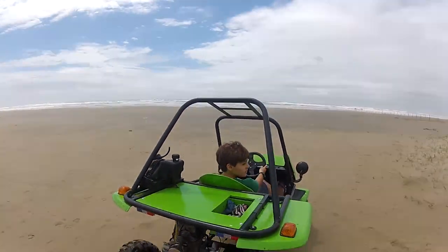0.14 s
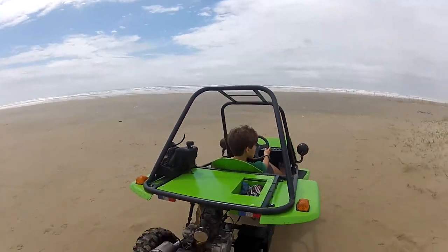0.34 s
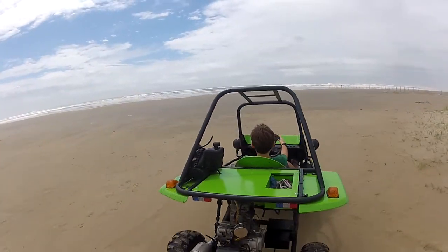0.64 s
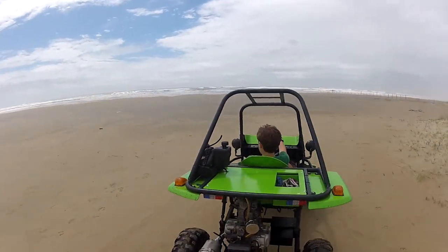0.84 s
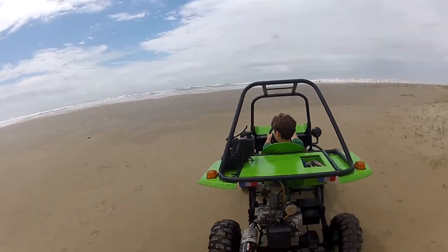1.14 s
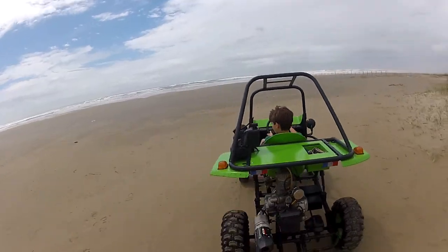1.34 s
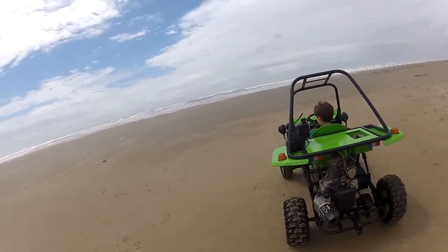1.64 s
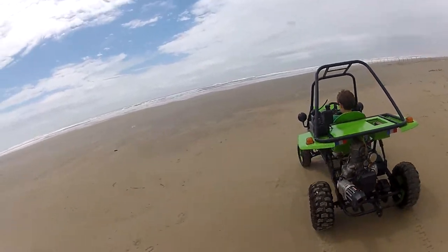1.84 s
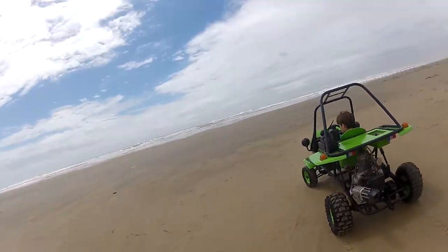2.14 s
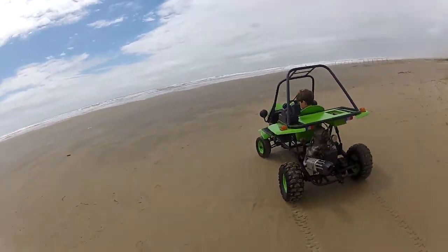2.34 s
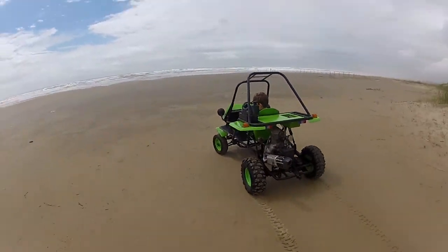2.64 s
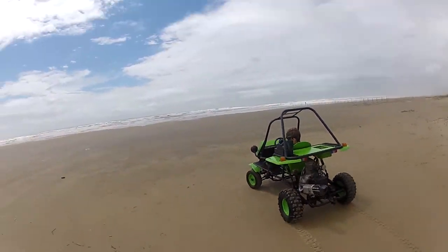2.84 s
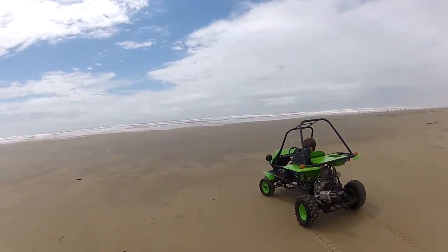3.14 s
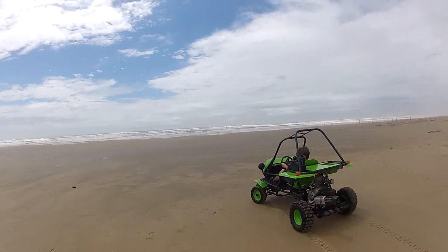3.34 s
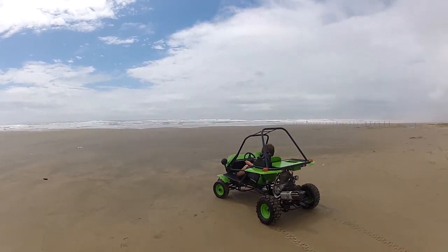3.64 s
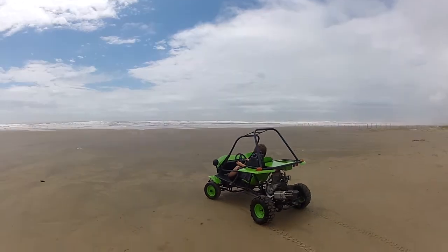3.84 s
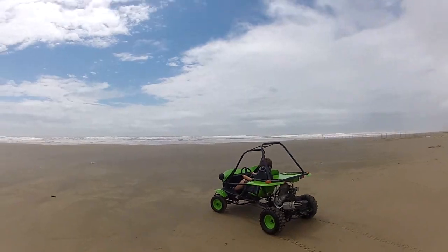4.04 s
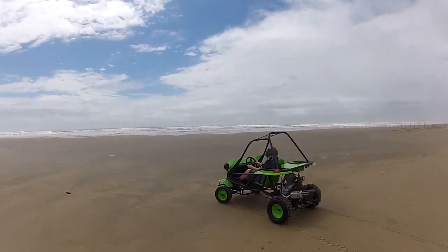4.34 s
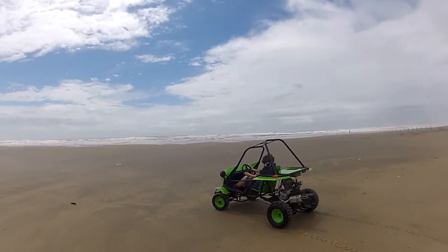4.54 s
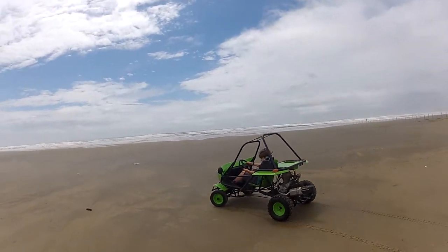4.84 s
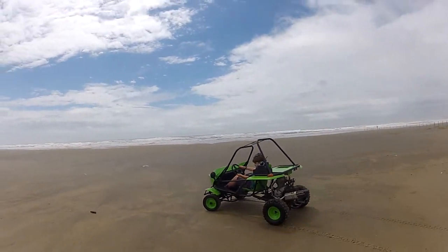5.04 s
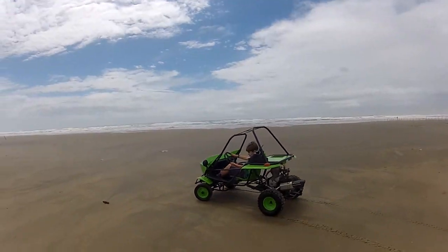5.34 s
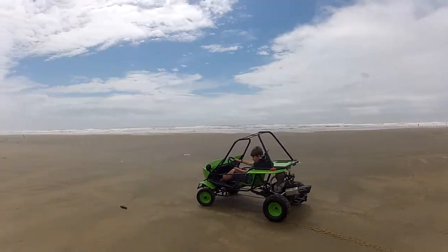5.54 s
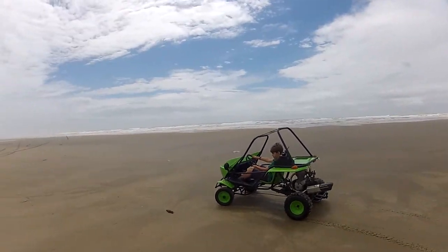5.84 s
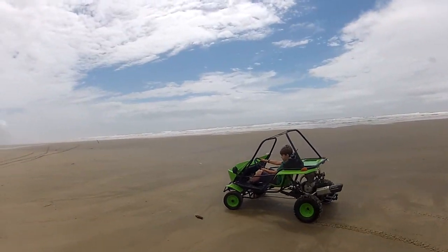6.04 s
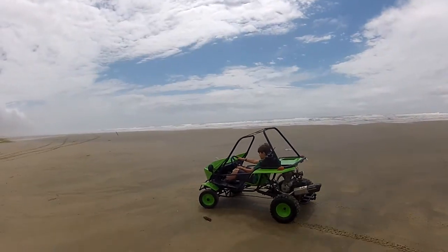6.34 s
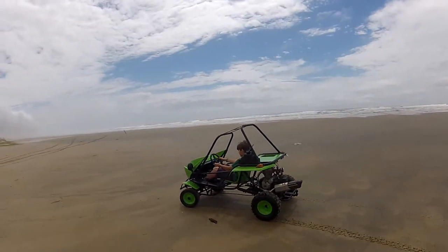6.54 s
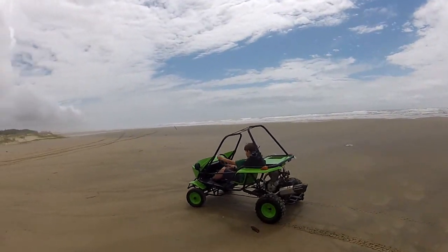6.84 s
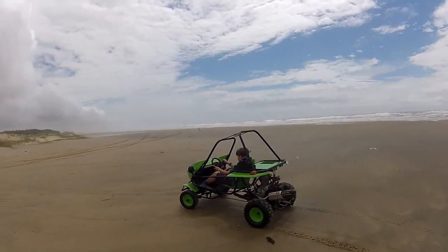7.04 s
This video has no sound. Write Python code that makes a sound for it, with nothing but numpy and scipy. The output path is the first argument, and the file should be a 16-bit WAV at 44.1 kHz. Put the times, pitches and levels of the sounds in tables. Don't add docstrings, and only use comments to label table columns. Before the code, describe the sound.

Outdoors on a beach, a little four-stroke engine chugs with boomy muffler pulses, ticking valves and jangling loose parts. It bogs briefly, then climbs to a quicker putter as the buggy moves off. A hand on the plastic camera case makes very close, loud clacks, low bumps and scraping, mostly in the third second, with a few later. Distant surf stays dull and faint, swelling slightly at the end. Lo-fi mono with harsh, grainy upper edges.

```python
import sys
import numpy as np
from scipy import signal
from scipy.fft import rfft, irfft
from scipy.io import wavfile
from scipy.ndimage import uniform_filter1d

SR = 44100
rng = np.random.default_rng(int(sys.argv[2]) if len(sys.argv) > 2 else 0)


def inscribe(sig):
    pcm = np.round(np.clip(np.atleast_2d(sig).T, -1, 1) * 32767)
    wavfile.write(sys.argv[1], SR, pcm.astype(np.int16))


def voltage_ratio(level):
    return 10 ** (np.asarray(level, float) / 20)


N = 317520
T = np.arange(N) / SR


def unit(x):
    return x / np.sqrt(np.mean(x ** 2))


def noise():
    return rng.standard_normal(N)


def band_noise(order, band_hz):
    sos = signal.butter(order, band_hz, "bandpass", fs=SR, output="sos")
    return unit(signal.sosfilt(sos, noise()))


def ring(x, hz, width_hz):
    b, a = signal.iirpeak(hz, hz / width_hz, fs=SR)
    return signal.lfilter(b, a, signal.lfilter(b, a, x))


def decay(t, t60_s):
    return np.exp(-np.log(1000) * t / t60_s)


def walk(rate_hz):
    k = int(SR / rate_hz)
    steps = np.repeat(rng.standard_normal(N // k + 1), k)
    return unit(uniform_filter1d(uniform_filter1d(steps, k), k)[:N])


def add(out, start_s, x):
    i = int(start_s * SR)
    out[i:i + len(x)] += x[:N - i]


def grit(spread_db):
    return noise() * voltage_ratio(spread_db * rng.exponential(size=N))


def whistle(hz, width_hz, steady):
    lowpass = signal.butter(2, width_hz / 2, fs=SR, output="sos")
    slow = unit(signal.sosfilt(lowpass, [noise(), noise()]))
    turn = 2 * np.pi * np.cumsum(hz) / SR
    return unit((steady + slow[0]) * np.sin(turn) + slow[1] * np.cos(turn))


def bump(phase, sharpness, at, times=1):
    return np.exp(sharpness * (np.cos(2 * times * np.pi * (phase - at)) - 1))


def chambers(pulses, band_hz, early_s):
    sos = signal.cheby1(3, 1.5, band_hz, "bandpass", fs=SR, output="sos")
    h = signal.sosfilt(sos, np.r_[np.hanning(60), np.zeros(SR // 8)])
    top = np.argmax(np.abs(h))
    return unit(signal.fftconvolve(pulses, -h / h[top])[top + int(early_s * SR):][:N])


def exhaust(fire, gulp, rear):
    boom = (1 - rear) * chambers(fire + gulp, (89.8, 179), early_s=0.0001)
    boom = boom + rear * chambers(fire + gulp, (77, 164.8), early_s=0.0001)
    pipe_echo = 0.39 * np.roll(fire, 800)
    bark = rear * voltage_ratio(-17) * chambers(fire + pipe_echo + 0.6 * gulp, (259, 422), early_s=0.0021)
    shell = voltage_ratio(-20.5) * chambers(fire, (200, 295), early_s=-0.0027)
    flutter = voltage_ratio(-17) * band_noise(3, (70, 200))
    return boom + bark + shell + flutter


def valve_gear(phase, uneven_db, rear, port_hz):
    stroke = bump(phase, 8.8, 0.03, times=2) * voltage_ratio(uneven_db)
    puff = bump(phase, 3.5, 0.13)
    tappet = unit(whistle(np.full(N, 1660.), 260, 0.9) * (0.35 + 0.6 * stroke + puff))
    port = voltage_ratio(-1.0 - 14 * rear) * unit(whistle(port_hz, 180, 1.2) * (0.2 + puff))
    return tappet + port


# pitch_hz, width_hz, side_level_db, added_from_behind_db
RATTLE_MODES = [
    (860, 176, -9, 0),
    (1410, 780, -9.5, 5.8),
    (2115, 480, 0, -7),
    (2440, 220, -6, 0),
    (2957, 110, -10, 3),
    (3254, 260, -4, 1.5),
    (3630, 450, -15.5, 11.5),
]


def loose_parts(phase, rear):
    gate = 1.6 + bump(phase, 1.5, 0.15, times=2)
    rattle = np.zeros(N)
    for hz, width_hz, side_db, rear_db in RATTLE_MODES:
        level = voltage_ratio(side_db + rear_db * rear + 2.4 * walk(9))
        rattle += level * unit(ring(grit(0.89) * gate, hz, width_hz))
    shield_level = voltage_ratio(-4.0 + 9.5 * rear + 1.6 * walk(30))
    shield = shield_level * unit(whistle(2710 - 100 * rear, 236, 0.34) * gate)
    return unit(rattle) + shield


# time_s, level_db at the camera, seen_from_behind (0-1), chassis_shake_db
DRIVE = [(0, -39.5, .88, 3), (.6, -42.5, .87, -2), (1, -42, .8, 2.5), (1.15, -38, .9, -4),
         (1.4, -38, .8, -1), (1.9, -38, .63, 0), (2.6, -39, .55, -1), (3.3, -40.5, .33, -2),
         (4.2, -42, .2, -.5), (5.2, -42.5, .2, -.5), (6.2, -42.5, .25, .5), (6.8, -41, .25, 1.5),
         (7.2, -41, .18, 1.5)]
# time_s, firings_per_s
ENGINE_SPEED = [(0, 15.648), (.95, 12.78), (1.7, 15.736), (2.35, 17.472), (2.55, 17.486), (3.25, 19.221),
                (3.55, 19.112), (3.7, 19.882), (4.5, 20.473), (5, 21.728), (5.25, 21.459), (5.55, 22.518),
                (6.25, 22.188), (6.5, 22.864), (7.2, 22.721)]
# time_s, whistle_hz, valve_gear_gain_db
PORT_TURN = [
    (5.3, 1150, 0),
    (6.2, 1230, 4),
    (6.8, 1300, 2),
]


def engine():
    phase = -0.444 + np.cumsum(np.interp(T, *np.transpose(ENGINE_SPEED))) / SR
    when, *columns = np.transpose(DRIVE)
    thud_db, rear, shake_db = (np.interp(T, when, c) for c in columns)
    rear = np.clip(rear, 0, 1)
    port_s, *turning = np.transpose(PORT_TURN)
    port_hz, valve_db = (np.interp(T, port_s, c) for c in turning)
    scatter = rng.standard_normal((int(phase[-1]) + 3, 3))[np.floor(phase).astype(int) + 1].T
    fire = np.diff(np.floor(phase), prepend=-1) * voltage_ratio(0.54 * scatter[0])
    gulp_level = voltage_ratio(-18.5 + 4.2 * rear + 1.3 * scatter[1])
    gulp = np.diff(np.floor(phase + 0.52), prepend=-1) * gulp_level
    out = voltage_ratio(thud_db) * exhaust(fire, gulp, rear)
    out += voltage_ratio(thud_db - 25 + 8 * rear + valve_db) * valve_gear(phase, 1.5 * scatter[2], rear, port_hz)
    out += voltage_ratio(thud_db - 15 - rear + shake_db) * loose_parts(phase, rear)
    return out


# time_s, level_db
HAND_JOLTS = [(.38, -41), (.66, -45), (1, -46), (1.22, -43), (1.95, -33), (2.13, -27), (2.4, -31),
              (2.61, -32), (2.77, -37), (2.95, -33), (3.5, -40), (4.27, -42), (7.06, -38)]


def sway():
    stops_s, walking_db, still_db, jolt_s = 4.7, -51, -59, 0.05
    motion = voltage_ratio(np.interp(T, (stops_s - 0.3, stops_s), (walking_db, still_db)))
    for s, db in HAND_JOLTS:
        motion += voltage_ratio(db) * np.exp(-((T - s) / jolt_s) ** 2)
    return voltage_ratio(-4.5) * band_noise(2, (18, 65)) * motion


# pitch_hz, level_db (per Hz)
SURF_COLOUR = [(25, -1), (70, -25), (280, -5.5), (340, -8.5), (850, -12.5), (1030, -34), (1300, -23),
               (2700, -26), (3600, -17)]


def surf():
    hz, db = np.transpose(SURF_COLOUR)
    colour = voltage_ratio(np.interp(np.log(np.fft.rfftfreq(N, 1 / SR) + 1), np.log(hz), db))
    swell_db = np.interp(T, (5.6, 7.2), (0, 5))
    return voltage_ratio(-55 + swell_db + 1.2 * walk(3.17)) * unit(irfft(rfft(noise()) * colour, N))


# time_s, level_db, pitch_hz, ring_s (to fade 60 dB)
CASE_THUMPS = [(0.348, -31, 48.4, 0.09), (0.789, -41, 70.4, 0.072), (1.929, -12, 147, 0.051),
               (2.019, -30, 102, 0.08), (2.078, -17, 123, 0.086), (2.149, -32, 37.7, 0.055),
               (2.253, -17, 87, 0.074), (2.393, -10.5, 175, 0.05), (2.469, -26, 99, 0.08),
               (2.59, -21, 35.0, 0.086), (2.619, -32, 32.3, 0.08), (2.745, -18, 45.8, 0.11),
               (2.769, -16, 61.4, 0.08), (2.818, -37, 153, 0.08), (2.959, -25, 45.8, 0.08),
               (3.043, -26, 94, 0.17), (3.06, -13, 113, 0.08), (3.09, -21.5, 133, 0.067),
               (3.499, -43, 135, 0.08), (3.939, -21.5, 159, 0.068), (4.263, -17, 128, 0.11),
               (4.379, -40, 53.8, 0.08), (7.036, -19, 75, 0.06)]


def thumps():
    out, t = np.zeros(N), T[:SR // 4]
    for s, db, hz, t60_s in CASE_THUMPS:
        swell = (1 - np.exp(-t / 0.0019)) * decay(t, max(t60_s, 0.01))
        add(out, s, -voltage_ratio(db) * swell * np.sin(2 * np.pi * hz * t))
    return out


# time_s, level_db, pitch_hz, ring_s
PART_PINGS = [(.349, -34, 496, 0.026), (1.094, -41.5, 1640, 0.054), (1.134, -38, 2560, 0.027),
              (1.277, -40.5, 2560, 0.02), (1.31, -38, 1630, .04), (1.349, -39.5, 2510, 0.028),
              (1.398, -39, 2560, 0.03), (1.423, -31.5, 2630, 0.017), (1.929, -32, 530, 0.049),
              (2.08, -31.5, 495, 0.13), (2.253, -24.5, 282, 0.033), (2.393, -21, 200, 0.035),
              (2.394, -9, 640, 0.023), (2.394, -9.5, 2570, 0.021), (2.395, -13, 3220, 0.018),
              (2.394, -10, 3600, 0.011), (2.586, -38, 256, 0.053), (3.09, -30.5, 216, 0.21),
              (3.51, -34.5, 605, 0.032), (3.939, -32, 333, 0.017), (4.202, -44, 1000, 0.016),
              (4.267, -32, 264, .04), (4.267, -18.5, 860, 0.035), (4.38, -18.5, 2480, 0.013)]


def pings():
    out, t = np.zeros(N), T[:SR // 5]
    for s, db, hz, t60_s in PART_PINGS:
        swell = (1 - np.exp(-t / 0.00052)) ** 2 * decay(t, t60_s)
        add(out, s, voltage_ratio(db) * swell / swell.max() * np.sin(2 * np.pi * hz * t))
    return out


# pitch_hz, relative_ring_time, level_db, part (0 shell, 1 lid, 2 latch)
CASE_MODES = [
    (640, 0.84, -9, 0),
    (860, 1.18, 1, 0),
    (1160, 0.7, 0, 1),
    (1432, 0.62, 1, 1),
    (1777, 0.86, 1, 1),
    (2120, 0.65, 0.5, 1),
    (2570, 0.84, -0.5, 1),
    (3230, 0.48, -0.5, 2),
    (3570, .6, 8.5, 2),
]
# time_s, shell_db, lid_db, lid_centre_hz
CASE_KNOCKS = [(.351, -39.5, -60, 1580), (.781, -36, -34, 1500), (1.927, -33, -25, 1180),
               (2.026, -39, -40, 1350), (2.137, -15, -27.5, 1970), (2.154, -49, -34, 2120),
               (2.252, -27, -12.5, 1900), (2.393, -3, -8.5, 2100), (2.409, -30, -35, 2200),
               (2.56, -32, -41, 1890), (2.584, -38, -36, 1300), (2.745, -31, -24, 2310),
               (2.751, -15, -11, 1450), (2.763, -44, -21, 1610), (2.809, -47, -43, 1180),
               (2.867, -41, -39, 2230), (2.956, -33, -24, 2370), (2.962, -38, -32, 1390),
               (2.988, -48, -34, 1260), (3.004, -54, -33, 1860), (3.033, -47, -35.5, 1920),
               (3.062, -26, -29, 1370), (3.089, -39, -28, 1770), (3.509, -44, -45, 1163),
               (3.94, -55, -27, 1900), (4.24, -46, -38, 2240), (4.262, -25, -27, 2300),
               (4.266, -26, -10.5, 2100), (4.379, -32.5, -28, 2300), (7.054, -52, -44, 1670)]


def knocks():
    out, t, rise_s = np.zeros(N), T[:SR // 16], 0.0006
    chance = rng.standard_normal((len(CASE_KNOCKS), 300 + len(CASE_MODES)))
    for (s, shell_db, lid_db, lid_hz), row in zip(CASE_KNOCKS, chance):
        ranges = (0.026, 0.018), (0.0011, 0.0006), (-2, 5)
        t60_s, contact_s, snap_db = (np.interp(max(shell_db, lid_db), (-35, -10), r) for r in ranges)
        push = row[:300] * np.exp(-t[:300] / contact_s)
        crack = row[:300] * np.exp(-t[:300] / 0.0012)
        add(out, s + rise_s, crack / np.abs(crack).max() * voltage_ratio(lid_db))
        snap = np.exp(-((t[:24] - t[12]) / 0.00008) ** 2)
        add(out, s + rise_s, snap * voltage_ratio(lid_db + snap_db))
        detune = 1 + 0.011 * row[300:]
        for (hz, long, db, part), k in zip(CASE_MODES, detune):
            swell = (1 - np.exp(-t / rise_s)) * decay(t, t60_s * long)
            tone = signal.fftconvolve(push, swell * np.sin(2 * np.pi * hz * k * t))
            lid_mode_db = lid_db - 9 * abs(np.log2(hz / lid_hz))
            struck_db = (shell_db, lid_mode_db, lid_db - 17)[int(part)]
            add(out, s, tone / np.abs(tone).max() * voltage_ratio(struck_db + db - 0.5))
    return signal.sosfilt(signal.butter(3, 430, "highpass", fs=SR, output="sos"), out)


# start_s, firmest_s, end_s, level_db, brightness_db
FINGER_STROKES = [(.41, .48, .6, -54, -4), (.7, .765, .86, -48.5, -2), (1.92, 1.935, 2.01, -42, -1),
                  (2.015, 2.04, 2.07, -42, -4), (2.045, 2.088, 2.18, -29.5, -8),
                  (2.16, 2.22, 2.27, -37, -7), (2.23, 2.3, 2.39, -35.5, 0), (2.4, 2.47, 2.55, -38, 0),
                  (2.5, 2.555, 2.58, -32.5, -2), (2.57, 2.62, 2.72, -46.5, -6),
                  (2.74, 2.762, 2.79, -35, -2), (2.855, 2.93, 3.05, -36.5, -6.5),
                  (3.04, 3.09, 3.12, -41, -7), (3.37, 3.46, 3.57, -58, 6), (7, 7.05, 7.12, -56, -4)]


def rubs():
    level, bright = np.zeros(N), np.zeros(N)
    for start, firm, end, db, bright_db in FINGER_STROKES:
        away = np.interp(T, (start, firm, end), (1, 0, 1))
        press = (away < 1) * voltage_ratio(db - 18 * away ** 2.1)
        level += press
        bright += press * voltage_ratio(bright_db)
    drag = voltage_ratio(2.5 * walk(90))
    slips = grit(5.5) * drag
    modes = []
    for hz, long, *_ in CASE_MODES:
        scrape = unit(grit(2.86) * drag) + 0.9 * unit(slips)
        modes.append(voltage_ratio(3.6 * walk(25.1)) * unit(ring(scrape, hz, 260 / long)))
    flex = voltage_ratio(-4) * unit(ring(slips, 185, 110)) + voltage_ratio(-12) * unit(ring(slips, 520, 130))
    return level * (unit(sum(modes[:6])) + flex) + bright * unit(sum(modes[6:]))


# start_s, end_s, pitch_hz, level_db
CASE_CREAKS = [
    (2.405, 2.479, 616, -31),
    (3.06, 3.17, 778, -45),
    (3.512, 3.542, 616, -48),
    (3.066, 3.11, 1830, -40),
    (3.088, 3.1, 1370, -29),
    (3.082, 3.102, 3390, -36),
]


def creaks():
    out = np.zeros(N)
    for start, end, hz, db in CASE_CREAKS:
        fade_in = np.clip((T - start) / 0.0023, 0, 1)
        fade_out = np.clip((end - T) / (0.39 * (end - start)), 0, 1)
        turn = 2 * np.pi * np.cumsum(hz * (1 + 0.0102 * walk(50))) / SR
        out += voltage_ratio(db + 3.2 * walk(60)) * fade_in * fade_out * np.sin(turn)
    return out


def scene():
    mix = engine() + sway() + surf() + thumps() + pings() + knocks() + rubs() + creaks()
    return np.tile(mix, (2, 1))


def top_cut(x):
    return signal.sosfilt(signal.butter(12, 16520, fs=SR, output="sos"), x)


def record(dry):
    x = signal.sosfilt(signal.butter(6, 3500, fs=SR, output="sos"), dry[0])
    slow = 1.362 * np.tanh(signal.resample_poly(x, 80, 441) / 1.241)
    held = signal.resample_poly(np.repeat(slow, 6), 147, 160)[:N]
    gentle_cut = signal.ellip(8, 0.3, 54, 15270, fs=SR, output="sos")
    steep_cut = signal.ellip(10, 0.2, 80, 16400, fs=SR, output="sos")
    mix = signal.sosfilt(np.r_[gentle_cut, steep_cut], held)
    return top_cut(np.tile(mix, (2, 1)))


dry = scene()
out = record(dry)
inscribe(out)
```